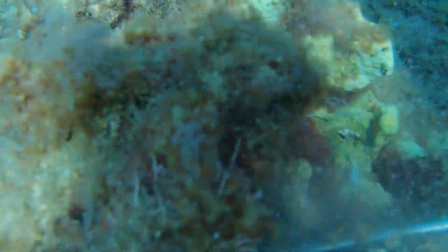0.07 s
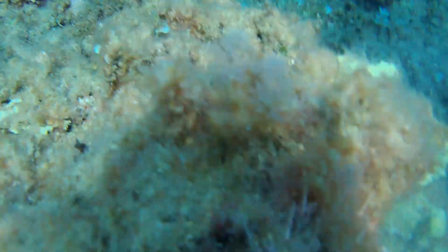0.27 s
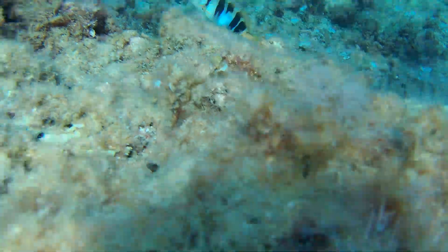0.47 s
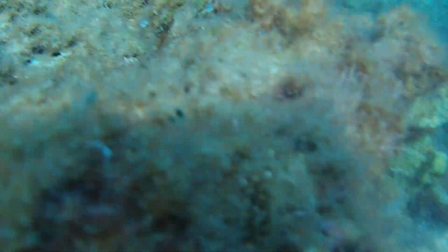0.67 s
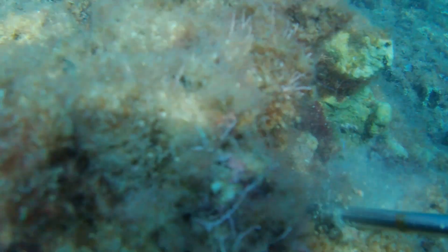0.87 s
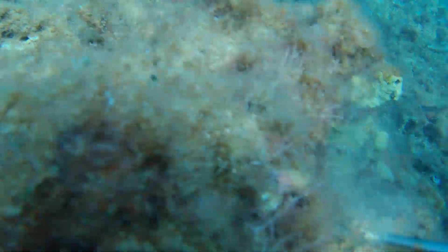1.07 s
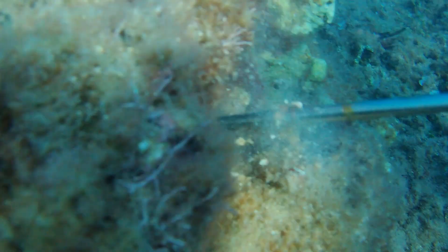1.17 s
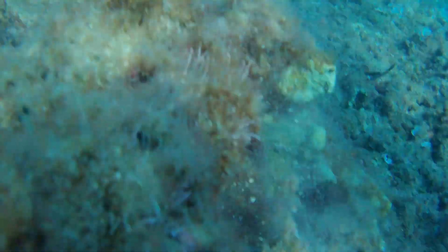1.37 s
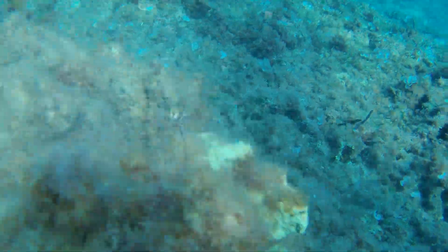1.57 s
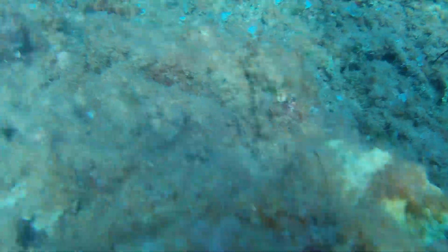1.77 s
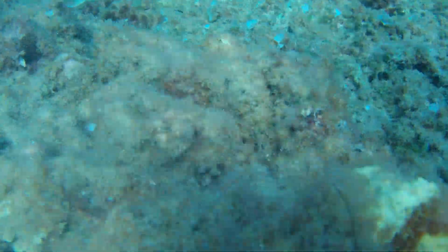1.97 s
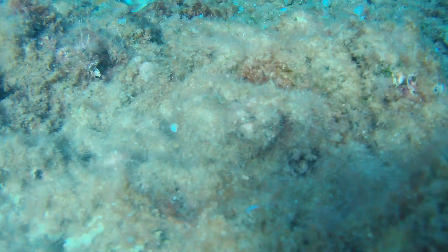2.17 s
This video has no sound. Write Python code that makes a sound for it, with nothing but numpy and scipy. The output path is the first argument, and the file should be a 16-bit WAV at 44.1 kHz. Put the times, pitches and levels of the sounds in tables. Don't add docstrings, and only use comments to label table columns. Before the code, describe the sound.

A sealed camera case bumps over an underwater rocky bed, giving dull hollow knocks, low thumps and small gritty ticks in irregular clusters, over a faint swirling rumble; very close, muffled, dry, no echo.

```python
import sys
import numpy as np
from scipy import signal
from scipy.fft import rfft, irfft, next_fast_len
from scipy.io import wavfile
from scipy.ndimage import uniform_filter1d, map_coordinates

SR = 44100
rng = np.random.default_rng(int(sys.argv[2]) if len(sys.argv) > 2 else 0)


def boost(x):
    u = np.asarray(x, float) / 20
    return 10 ** u


def materialize(psi):
    bounded = np.clip(np.atleast_2d(psi).T, -1, 1)
    quanta = np.round(bounded * 32767).astype(np.int16)
    wavfile.write(sys.argv[1], SR, quanta)


N = 97240


def unit(x):
    return x / np.sqrt(np.mean(x ** 2, axis=-1, keepdims=True) + 1e-20)


def wobble(rate):
    knots = rng.standard_normal(int(N * rate / SR) + 4)
    return map_coordinates(knots, [np.arange(N) * rate / SR])


def noise_rows(rows, t):
    return rng.standard_normal((len(rows), len(t)))


# [f/Hz, lift/dB]
RINGS = [(480, 10), (590, 8), (775, 5), (1190, 7.5), (1640, 8), (2090, 6), (4800, 5), (6250, 2.5)]
RING_Q = 20


def coloured(x, points):
    m = next_fast_len(x.shape[-1] + 8192)
    hz = np.fft.rfftfreq(m, 1 / SR)
    f, v = np.transpose(points)
    db = np.interp(np.log(hz + 1), np.log(f + 1), v)
    for centre, lift in RINGS:
        db = db + lift / (1 + (2 * RING_Q * (hz - centre) / centre) ** 2)
    cepstrum = irfft(np.log(boost(np.maximum(db, -100))), m)
    cepstrum[1:m // 2] *= 2
    cepstrum[m // 2 + 1:] = 0
    return irfft(rfft(x, m) * np.exp(rfft(cepstrum)), m)[..., :x.shape[-1]]


def bursts(rows, wide, tail, carrier):
    rows = np.array(rows)
    offset = np.arange(-2048, 4096)
    t = offset / SR
    sigma = wide * rows[:, 2:3]
    env = np.exp(-0.5 * (t / (sigma * np.where(t < 0, 1, tail))) ** 2)
    wave = env * carrier(rows, t)
    wave *= np.sqrt((env ** 2).sum(1) / (wave ** 2).sum(1))[:, None]
    margin = 4096
    at = (np.round(rows[:, :1] * SR).astype(int) + offset + margin).ravel()

    def lay(v):
        return np.bincount(at, (boost(rows[:, 1:2]) * v).ravel(), N + 16384)[margin:][:N]

    return lay(wave), lay(env)


def swing(rows, t, sag, scatter):
    cycles = rows[:, 3:4] * t * (1 - sag * np.tanh(t / rows[:, 2:3]))
    start = scatter * (rng.random((len(rows), 1)) - 0.5)
    return np.sin(2 * np.pi * (cycles + start))


def halo(env, db, points):
    trail_s, lead_over_trail = 0.0048, 0.3
    t = np.arange(-4096, 4097) / SR
    shape = np.exp(-np.abs(t) / (trail_s * np.where(t < 0, lead_over_trail, 1)))
    spread = signal.fftconvolve(env ** 2, shape / shape.sum(), "same")
    rough = rng.standard_normal(N) * boost(3.14 * wobble(160))
    return boost(db) * np.sqrt(np.abs(spread)) * unit(coloured(rough, points))


def patchy(x):
    z = signal.stft(x, nperseg=128)[2]
    field = uniform_filter1d(rng.standard_normal(z.shape), size=4, axis=0)
    field = uniform_filter1d(field, size=3, axis=1)
    patch_db = 4.5 * field / field.std()
    y = signal.istft(z * boost(patch_db), nperseg=128)[1][:N]
    return y * np.std(x) / np.std(y)


STARVED = [
    0.332,
    1.394,
    1.781,
    2.097,
]


def kept():
    half_s = 0.0075
    t = np.arange(N) / SR
    return 1 - 0.88 * sum(np.exp(-((t - c) / half_s) ** 6) for c in STARVED)


# [f/Hz, level/dB per Hz]
HISS = [(760, -35), (1300, 15.5), (1460, -31.5), (3470, -0.5), (4700, 0), (5500, -7), (15800, -9)]


def preamp_hiss(x):
    hiss_db, recover_s, knee_db = -58, 0.12, -19
    squeeze = 0.99
    keep = np.exp(-1 / (recover_s * SR))
    level_db = 10 * np.log10(signal.lfilter([1 - keep], [1, -keep], x ** 2) + 1e-9)
    duck = boost(hiss_db - squeeze * np.maximum(level_db - knee_db, 0))
    return kept() * duck * unit(coloured(rng.standard_normal(N), HISS))


def grains(rate, spread_db, points):
    size = boost(spread_db * rng.exponential(size=N))
    hits = (rng.random(N) < rate / SR) * size * rng.choice([-1, 1], N)
    return unit(coloured(unit(hits) + 0.89 * rng.standard_normal(N), points))


# [f/Hz, level/dB per Hz]
WALL = [(13, -87.5), (22, -19.5), (54, -12.5), (119, 1), (180, -0.5), (237, -9.5), (400, -10.5), (520, -40),
        (880, -120)]
# [f/Hz, level/dB per Hz]
RUB = [(150, -22.5), (260, -14), (760, -0.5), (1020, -22.5), (1220, -25), (1500, -42), (2400, -34.5),
       (4000, -100)]
# [f/Hz, level/dB per Hz]
GRIT = [(1060, -3.5), (1700, 2.5), (2500, -5), (3800, -4.5), (6200, -8), (8600, -12.5), (10000, -22),
        (15800, -35)]
# [t/s, push level/dB, grit level/dB]
SWIRL = [(0, -30, -39.5), (.2, -36, -56.5), (.32, -35.5, -53), (0.549, -25, -50), (.645, -36.5, -58.5),
         (.7, -25.5, -49), (.82, -30, -56.5), (1.03, -34, -63.5), (1.14, -36, -60), (1.205, -33, -59),
         (1.4, -36, -59.5), (1.645, -47, -66.5), (1.72, -36, -67), (1.88, -33.5, -61.5), (2.2, -30, -53.5)]


def swirl():
    s, push_db, grit_db = np.transpose(SWIRL)
    t = np.arange(N) / SR
    push = np.interp(t, s, push_db)
    grit = np.interp(t, s, grit_db)
    flutter = 1.3 * wobble(14) + 2.5 * wobble(45)
    pushes = boost(push + 1.5 + flutter + 3.3 * wobble(24)) * grains(400, 2.34, WALL)
    rubs = boost(push - 8 + 1.11 * flutter + 2.2 * wobble(29.68)) * grains(980, 2.8, RUB)
    spits = patchy(grains(1200, 2, GRIT)) * boost(2.2 * wobble(90))
    fizz = kept() * boost(grit + 1.5 + 0.6 * flutter) * spits
    return pushes + rubs + fizz


# [start t/s, level/dB, fade/s, brightness/dB]
TICKS = [(0.008, -21, 0.0025, -5), (0.045, -22, 0.0038, -8), (0.105, -49, 0.0025, 6),
         (0.107, -48, 0.0029, 0), (0.149, -43, .003, -4), (0.162, -38.5, 0.0034, -5),
         (0.198, -44.5, 0.0074, 2), (0.35, -58, 0.0014, -6), (0.358, -43.5, .002, 9.5),
         (0.409, -41, 0.012, -6), (0.421, -39.5, .002, 4), (0.441, -26.5, 0.002, -0.5),
         (0.457, -41, .002, 5.5), (0.474, -43, 0.0013, 2), (0.533, -41, 0.002, -2.5),
         (0.564, -41.5, 0.0063, 3), (0.576, -36, 0.016, 2), (0.585, -40, 0.0018, 5.5),
         (0.59, -34, 0.0056, -4), (0.602, -40.5, 0.0025, 3), (0.663, -48, .003, 0), (0.708, -43, .003, -6),
         (0.7385, -33.5, .003, -2), (0.742, -30, 0.0096, 2.5), (0.76, -33.5, 0.0056, -2),
         (0.772, -36, 0.0031, -3), (0.778, -23, 0.0027, -7), (0.798, -47, 0.0012, -4),
         (0.882, -39, .0015, -1), (0.897, -32, 0.0017, -3), (0.915, -49.5, .002, 7),
         (0.924, -26, 0.0025, 2.5), (0.986, -48.5, .006, -4), (1.262, -50.5, .004, -4.5),
         (1.271, -45, 0.0039, -3.5), (1.32, -45, 0.002, -2), (1.327, -46.5, .005, 1.5),
         (1.344, -33.5, 0.0077, -7), (1.481, -26, 0.0024, -9.5), (1.501, -28.5, 0.0052, -9),
         (1.512, -29.5, 0.0077, -5), (1.542, -37.5, 0.0027, -3), (1.546, -40, 0.0043, -0.5),
         (1.659, -46, 0.0031, 2), (1.889, -50, 0.02, 0.5), (2.017, -53, 0.0012, 6),
         (2.161, -40, .002, 10.5), (2.184, -56, .002, 16)]


def ticks():
    s, db, fade, bright_db = np.transpose(TICKS)
    rise_s, bright_hz = 0.00058, 4960

    def carrier(rows, t):
        spectrum = rfft(coloured(noise_rows(rows, t), GRIT))
        hz = np.fft.rfftfreq(len(t), 1 / SR) + 1
        high = 1 / (1 + (bright_hz / hz) ** 4)
        return irfft(spectrum * boost(bright_db[:, None] * (2 * high - 1)), len(t))

    rows = np.c_[s, db, np.full(len(s), rise_s)]
    x, env = bursts(rows, 0.88, fade[:, None] / rise_s, carrier)
    return patchy(boost(2) * (x + halo(env, -21.5, GRIT)))


# [f/Hz, level/dB per Hz]
SHELL = [(150, -14.5), (260, -1), (699, -5.5), (779, -2.5), (1010, -34), (1200, -15), (1360, -17.5),
         (1670, -25), (2700, -39.5), (3510, -49.5), (5940, -120)]
# [t/s, peak level/dB]
TAPS = [(0.196, -21.5), (0.54, -46), (0.663, -21.5), (1.058, -22.5), (1.392, -24.5), (1.41, -23),
        (1.447, -22.5), (1.861, -33), (1.892, -17.5), (1.96, -27.5), (2.072, -27), (2.146, -27.5)]


def taps():
    rise_s = 0.001216
    rows = [(s + rise_s, db - 8, rise_s) for s, db in TAPS]

    def struck(body):
        return bursts(rows, 0.67, 10, lambda r, t: coloured(noise_rows(r, t), body))[0]

    return struck(SHELL) + boost(2) * struck(WALL)


# [t/s, level/dB, length/s, f/Hz]
KNOCKS = [(0.01, -9, 0.0048, 586), (0.049, -18, 0.0076, 945), (0.149, -19.5, 0.0027, 694),
          (0.165, -28.5, 0.015, 596), (0.235, -26.5, 0.008, 800), (0.349, -13, 0.0043, 790),
          (0.361, -15, 0.0044, 750), (0.375, -16.5, 0.0036, 720.0), (0.386, -16.5, 0.0064, 780),
          (0.443, -13.5, 0.0048, 520), (0.295, -32.5, 0.0097, 804), (0.593, -15.5, 0.0058, 583),
          (0.746, -13, 0.013, 638), (0.78, -16, 0.0067, 731), (0.864, -22, 0.011, 500),
          (0.9, -12.5, 0.0038, 476), (0.927, -12, 0.0035, 510), (0.963, -19, 0.005, 580),
          (0.991, -18.0, 0.0056, 605), (0.455, -21, 0.0054, 700), (1.085, -31.5, 0.025, 700),
          (1.238, -20, 0.014, 720), (1.256, -18.5, 0.027, 600), (1.278, -13.5, 0.0059, 594),
          (1.318, -17.5, 0.0031, 565), (1.334, -12.5, 0.0073, 615), (1.347, -14, 0.0027, 620),
          (1.485, -11, 0.011, 814), (1.502, -14.5, 0.00057, 660), (1.511, -10, 0.0032, 815),
          (1.52, -16.5, 0.014, 918), (1.549, -11, 0.0047, 745), (1.911, -23.5, 0.0043, 610),
          (2.087, -27, 0.0062, 800), (2.105, -31, 0.021, 600)]


def knocks():
    tone = 0.31
    upper_hz, upper_db = 1170, -12.5

    def carrier(rows, t):
        upper_gain = boost(upper_db + 24 * np.log2(rows[:, 3:4] / 600))
        upper = upper_gain * np.sin(2 * np.pi * (upper_hz * t + rng.random((len(rows), 1))))
        ring = np.sqrt(2) * (swing(rows, t, 0.063, 1.0) + upper)
        rough = unit(coloured(noise_rows(rows, t), SHELL))
        return tone * ring + (1 - tone) * rough

    x, env = bursts(KNOCKS, 0.3, 2.63, carrier)
    return boost(-3) * x + halo(env, -7, SHELL)


# [t/s, level/dB, length/s, f/Hz]
THUMPS = [(0.011, -18, 0.0024, 176), (0.052, -23.5, 0.011, 178), (0.363, -23, 0.017, 190),
          (0.38, -21.5, 0.021, 200), (0.443, -18.5, 0.0058, 220), (0.508, -20.5, 0.002, 161),
          (0.164, -24.5, 0.0093, 198), (0.236, -38, 0.0085, 154), (0.478, -22, 0.0078, 170),
          (0.554, -19, 0.02, 182), (0.58, -20.5, 0.016, 170), (0.598, -14.5, 0.014, 155),
          (0.668, -25.5, 0.008, 148), (0.688, -21.5, 0.0038, 199), (0.71, -18, 0.0037, 230),
          (0.741, -14.5, 0.0094, 140), (0.749, -20.5, 0.0077, 163), (0.754, -22.5, 0.0054, 316),
          (0.76, -9.5, 0.0027, 173), (0.784, -13, 0.011, 137), (0.86, -11.5, 0.0023, 324),
          (0.868, -20.5, 0.006, 312), (0.8985, -5.5, 0.0024, 306), (0.908, -13.5, 0.0062, 192),
          (0.918, -22.5, 0.0074, 185), (0.926, -6, 0.0029, 346), (0.935, -20.5, 0.0056, 211),
          (0.962, -18.5, 0.0017, 159), (0.976, -19.5, 0.0096, 150), (0.991, -15.5, 0.0045, 306),
          (1.168, -25.5, 0.0098, 120), (1.262, -22.5, 0.0065, 275), (1.279, -10.5, 0.0083, 132),
          (1.33, -14.5, 0.03, 141.6), (1.346, -10, 0.016, 138), (1.502, -16, 0.011, 163),
          (1.519, -16, 0.016, 181), (1.535, -13.5, 0.014, 163), (1.554, -9, 0.0072, 154.4),
          (1.754, -18, 0.01, 130), (1.817, -16, 0.0063, 159), (1.868, -25.5, 0.0045, 189),
          (1.897, -13.5, 0.0067, 190), (1.917, -17.5, 0.014, 174), (2.062, -20, 0.0052, 162.0),
          (2.076, -20.5, 0.0062, 177), (2.15, -29, 0.016, 134), (2.165, -26.5, 0.008, 142),
          (2.178, -24.5, 0.0097, 167)]


def thumps():
    x, env = bursts(THUMPS, 0.45, 0.85, lambda r, t: swing(r, t, 0.1, 0.2))
    return boost(4.5) * x + halo(env, -6, WALL)


def scene():
    return (swirl() + ticks() + taps() + knocks() + thumps())[None]


def band_limit(x):
    return signal.sosfilt(signal.butter(12, 15950, fs=SR, output="sos"), x)


def record(dry):
    low_cut = signal.butter(1, 13.3, "high", fs=SR, output="sos")
    x = signal.sosfiltfilt(low_cut, dry)
    x = x + preamp_hiss(x)
    x = x / (1 + np.abs(x / 0.98) ** 6) ** (1 / 6)
    return band_limit(x)


dry = scene()
out = record(dry)
materialize(out)
```